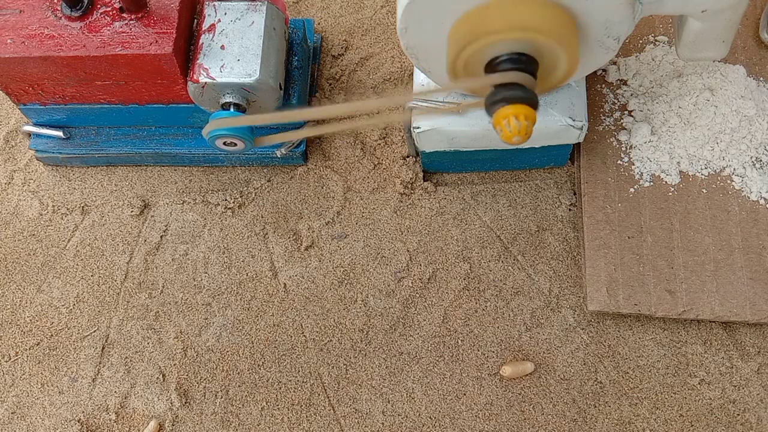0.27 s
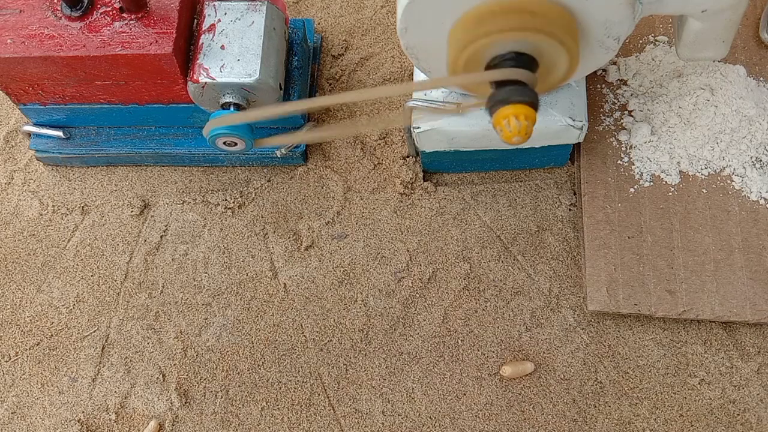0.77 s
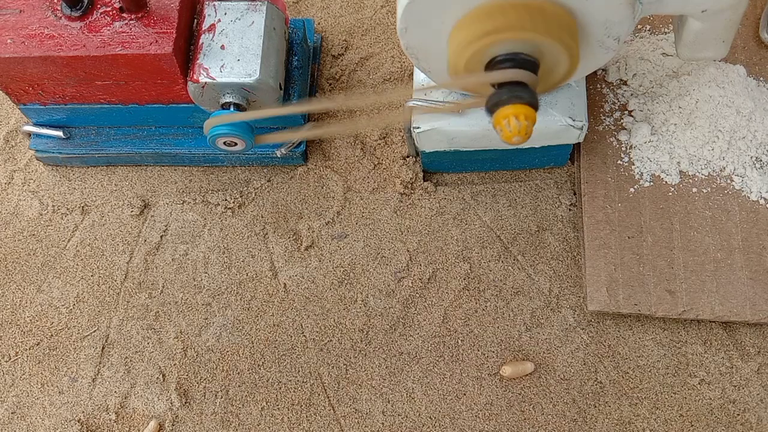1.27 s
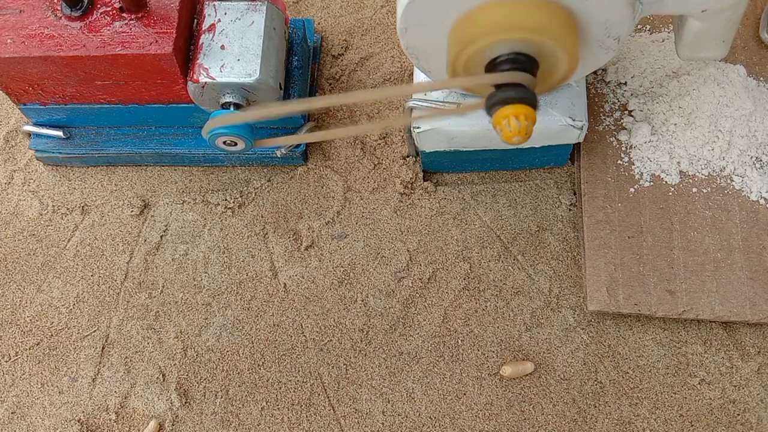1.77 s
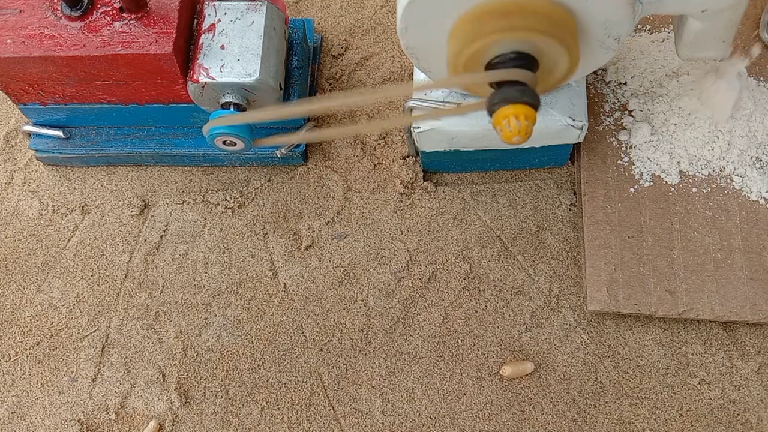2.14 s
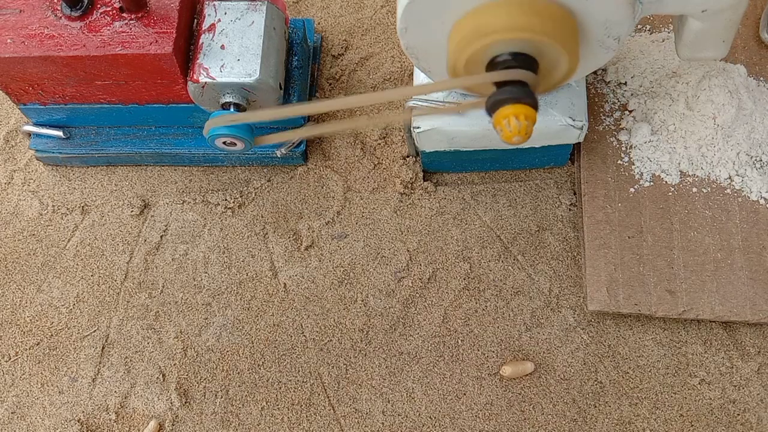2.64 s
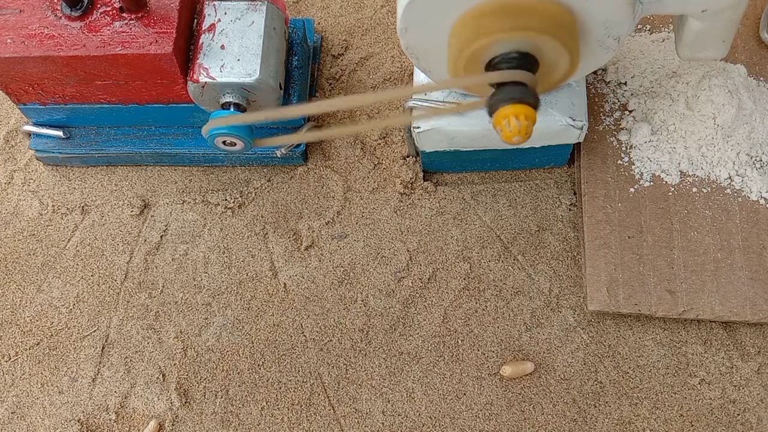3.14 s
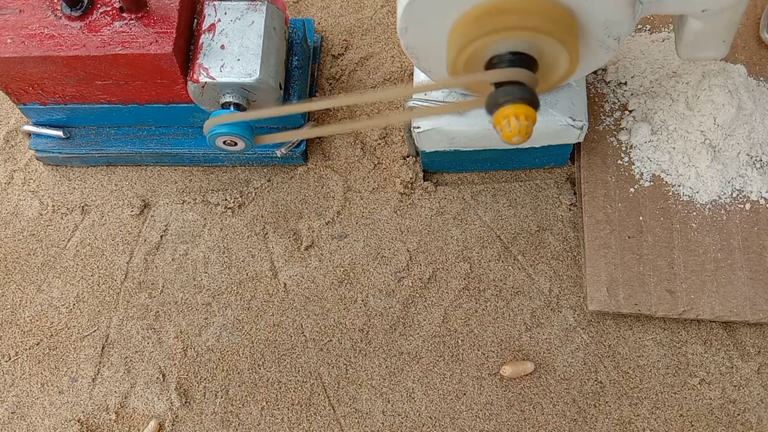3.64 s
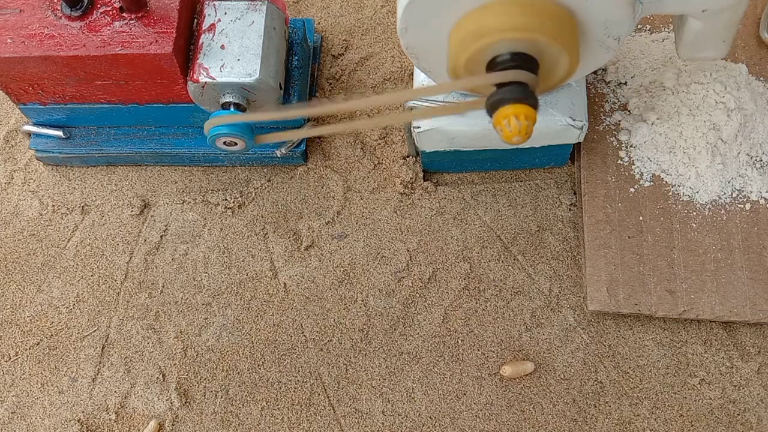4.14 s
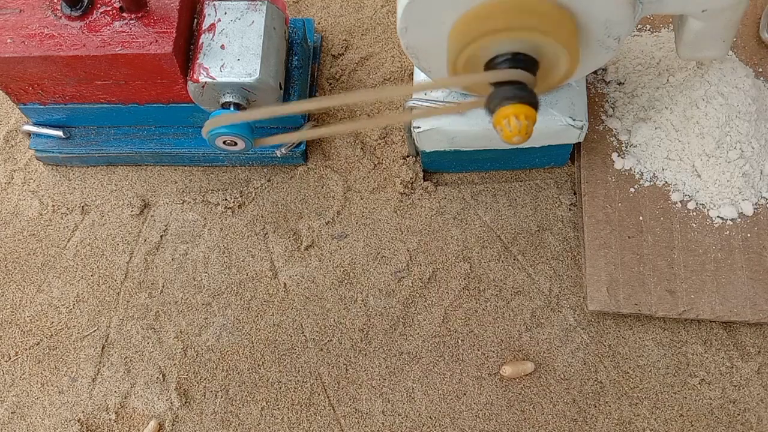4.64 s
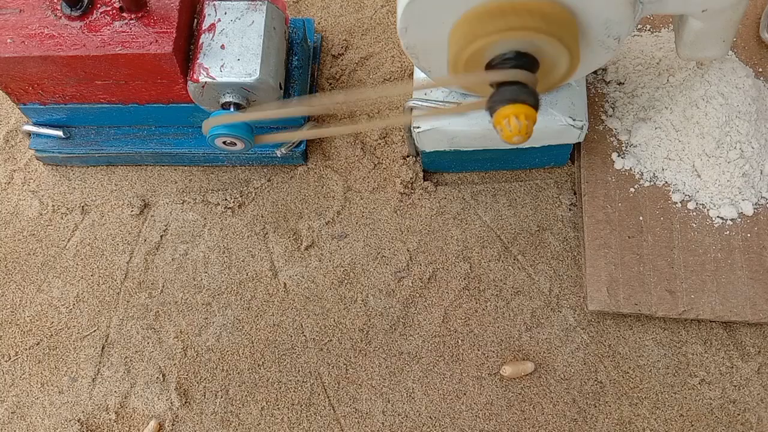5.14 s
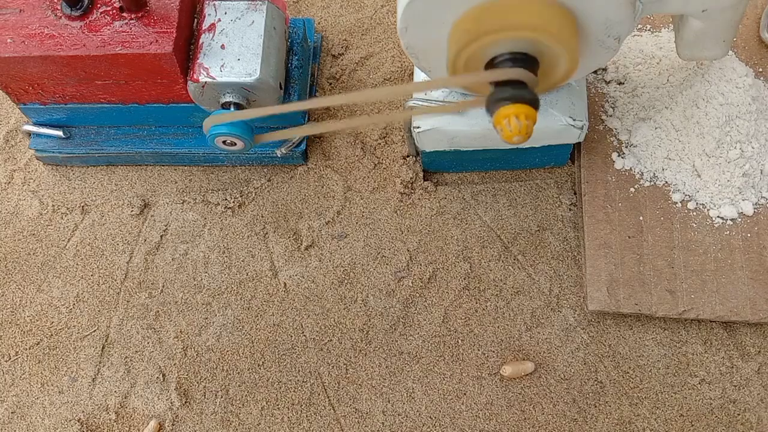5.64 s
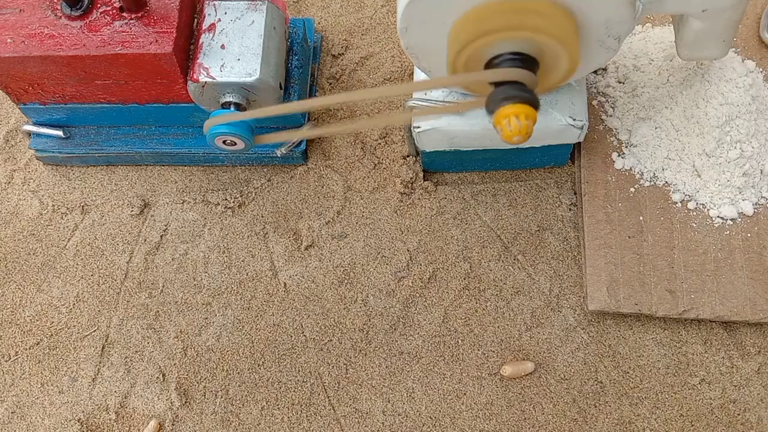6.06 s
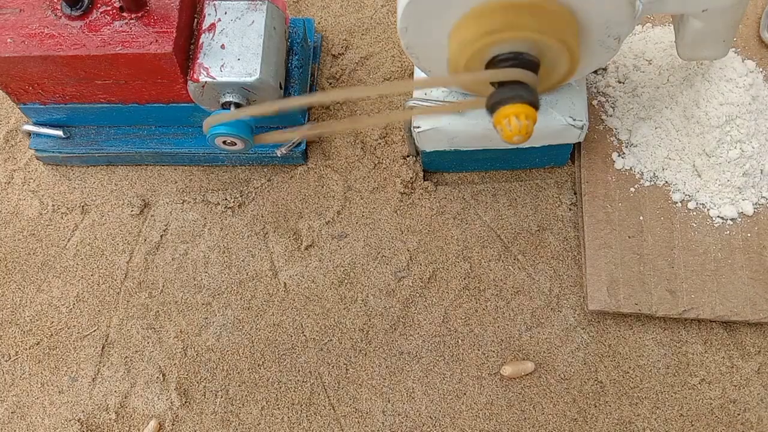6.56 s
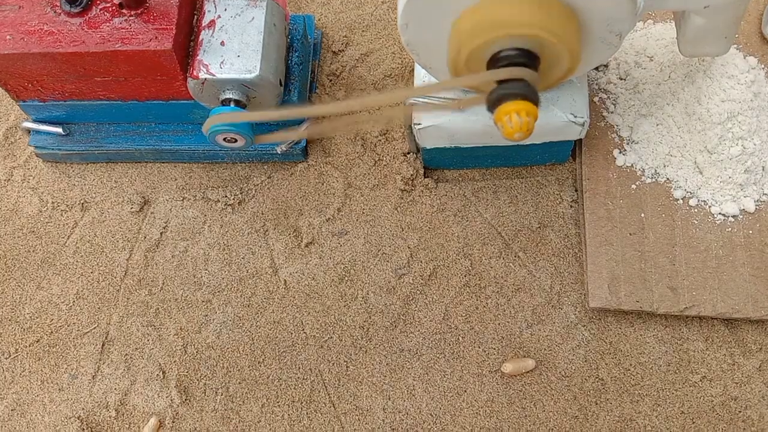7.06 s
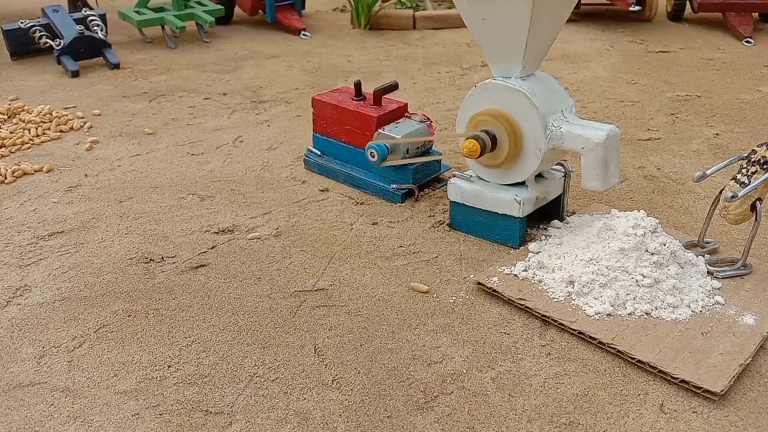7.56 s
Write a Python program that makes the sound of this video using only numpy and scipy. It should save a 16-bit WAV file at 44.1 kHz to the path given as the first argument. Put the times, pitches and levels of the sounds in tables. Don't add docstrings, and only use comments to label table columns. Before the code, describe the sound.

A small single-cylinder engine knocks and clatters, speeding up from six to twelve firings a second, then coasting, the run-up repeating in overlapping passes.

```python
import sys
import numpy as np
from scipy import signal
from scipy.fft import rfft, irfft
from scipy.io import wavfile
from scipy.ndimage import uniform_filter1d

SR = 44100
rng = np.random.default_rng(int(sys.argv[2]) if len(sys.argv) > 2 else 0)


def to_linear_factor(level_db):
    exponent = np.asarray(level_db, float) / 20
    return 10 ** exponent


def unload_audio(sound):
    columns = np.transpose(np.atleast_2d(sound))
    steps = np.round(np.clip(columns, -1, 1) * 32767)
    wavfile.write(sys.argv[1], SR, steps.astype(np.int16))


N = 343980
LEAD_S, RUN_S = .22, 3.06
M = int(RUN_S * SR)
T = np.arange(M) / SR - LEAD_S
START_RATE = 6.0097
CYCLES_RUN = 30
CUT_S = 2.03


def level(x):
    return x / np.sqrt(np.mean(x ** 2))


def colour(x, points):
    hz, db = np.transpose(points)
    f = np.fft.rfftfreq(4096, 1 / SR)
    cep = irfft(np.interp(np.log(f + 1), np.log(hz), db) * np.log(10) / 20)
    cep[1:2048] *= 2
    cep[2049:] = 0
    impulse = irfft(np.exp(rfft(cep)))[:2048]
    return signal.fftconvolve(x, impulse)[:len(x)]


def ring(modes, spread_db, detune):
    hz, db, t60 = np.transpose(modes)[:, :, None]
    luck = rng.standard_normal((2, len(modes), 1))
    t = np.arange(2200) / SR
    decay = np.exp(-np.log(1000) * t / t60)
    tones = np.sin(2 * np.pi * hz * (1 + detune * luck[1]) * t)
    response = np.sum(to_linear_factor(db + spread_db * luck[0]) * tones * decay, axis=0)
    bass_cut = signal.butter(4, 850, "high", fs=SR, output="sos")
    return signal.sosfilt(bass_cut, response)


def add(track, s, sound):
    i = int((s + LEAD_S) * SR)
    track[i:i + len(sound)] += sound[:M - i]


def grit(count, scatter_db):
    size_db = scatter_db * np.repeat(rng.uniform(-0.85, 1, count // 24 + 1), 24)[:count]
    return level(rng.standard_normal(count) * to_linear_factor(size_db))


def fade_db(s):
    return -13.5 * np.maximum(0.31 - s, 0) - 63 * np.maximum(s - 2.5, 0)


def gained(s):
    gain_per_s, drag_per_s2, governed_rate = 3.2738, .0718, 12.548
    rate = START_RATE + gain_per_s * s - drag_per_s2 * s ** 2
    return np.minimum(rate, governed_rate) - START_RATE


def moments(share):
    first_firing_s = -.0171
    turns = np.cumsum(START_RATE + gained(T)) / SR
    turns_since = turns - np.interp(first_firing_s, T, turns)
    return np.interp(np.arange(CYCLES_RUN) - 1 + share, turns_since, T)


def hum():
    band = signal.butter(2, (35, 70), "band", fs=SR, output="sos")
    return to_linear_factor(-71) * level(signal.sosfilt(band, rng.standard_normal(N)))


def dove():
    # start_s, length_s, pitch_hz, level_db, scoop (share of pitch), scoop_s
    coo_notes = [
        (2.26, .31, 347.5, -39.5, -.16, .022),
        (2.745, .11, 330, -37, .11, .06),
    ]
    attack_s, release_s, sag_db_per_s, wobble_db = .025, .06, -16.5, 1.5
    out = 0
    slow = uniform_filter1d(rng.standard_normal((2, M)), size=900, axis=1)
    wobble = level(uniform_filter1d(slow, size=900, axis=1))
    for s, length, pitch, db, scoop, scoop_s in coo_notes:
        since = np.clip(T - s, 0, length)
        hz = pitch * (1 + scoop * np.exp(-since / scoop_s) + .002 * wobble[0])
        phase = 2 * np.pi * np.cumsum(hz) / SR
        voice = np.sin(phase) + to_linear_factor(-12) * np.sin(2 * phase)
        shape = np.minimum(since / attack_s, 1) * np.minimum((length - since) / release_s, 1)
        loudness = to_linear_factor(db + sag_db_per_s * since + wobble_db * wobble[1])
        out = out + np.sqrt(2) * shape * loudness * voice
    return out


def puffs():
    pipe_hz = (470, 590)
    puff_db, coast_db, bark_db, bark_scatter_s = -42, -24, -30.5, 0.00788
    out, t = np.zeros(M), np.arange(1000) / SR
    swell = t / .003 * np.exp(1 - t / .003)
    luck = rng.standard_normal((CYCLES_RUN, 5))
    for opens, fires, (low, high, early, low2, high2) in zip(moments(.525), moments(0), luck):
        opening_db = (coast_db if opens > CUT_S else puff_db) + fade_db(opens)
        bark_s = fires + bark_scatter_s * np.clip(early, -1, 1)
        firing_db = bark_db - 30 * (fires > CUT_S)
        blows = [(opens, opening_db, low, high), (bark_s, firing_db, low2 - 1.5, high2)]
        for s, db, *mix in blows:
            note = 0
            for hz, m in zip(pipe_hz, mix):
                note = note + to_linear_factor(db - 5 + 2 * m) * np.sin(2 * np.pi * hz * (1 + .012 * m) * t)
            add(out, s, note * swell)
    return out


def pings():
    count, low_hz, high_hz, ring_cycles, scatter_db = 2600, 900, 9000, 17, 3
    when, pitch, size = rng.uniform(size=(count, 3)).T[:, :, None]
    k = np.arange(700)
    hz = low_hz * (high_hz / low_hz) ** pitch
    strength = to_linear_factor(-scatter_db * np.log(size + 0.09)) * np.sqrt(hz)
    decay = np.exp(-k / SR * np.sqrt(hz * 3000) / ring_cycles)
    tick = strength * np.sin(2 * np.pi * hz * k / SR) * decay
    place = (when * M).astype(int) + k
    return level(np.bincount(place.ravel(), tick.ravel(), M)[:M])


def rattle_envelopes(valve_times):
    start_db, db_per_rate, cut_db, coast_db_per_s, treble_cut_db = -23.5, 0.796, 1, -15.5, -14.5
    after, dull_db = np.zeros((2, M))
    firing = moments(0)
    for s in valve_times:
        after_db = start_db + db_per_rate * gained(s)
        after_db += (s > CUT_S) * (cut_db + coast_db_per_s * (s - CUT_S))
        on = slice(int((s + LEAD_S) * SR) + 1, int((s + LEAD_S + .22) * SR))
        since = T[on] - s
        gap = np.min(firing[firing > s], initial=s + .17) - s
        late_tap = 0.16 * np.exp(-((since - 0.41 * gap) / 0.0036) ** 2)
        settle = to_linear_factor(after_db + 0.56) * (1 + late_tap + 0.66 * np.exp(-since / (0.45 * gap)))
        choke = .3 + .7 * np.exp(-np.maximum(since - gap, 0) / .016)
        after[on] = settle * choke * np.minimum(since / 0.0039, 1)
        dull_db[on] = (-3.5 + treble_cut_db * (s > CUT_S)) * np.clip(since / gap, 0, 1)
    return after, dull_db


def rattle(after, tin_modes):
    # pitch_hz, level_db
    rattle_spectrum = [(150, -47.5), (240, -16.5), (400, -20.5), (580, -4.5), (740, -12.5), (960, -5),
                       (1500, -3.5), (2100, -0.5), (3300, 0), (3760, -13.5), (4500, 0), (7200, -13),
                       (9000, -16), (16000, -31)]
    hiss, shake = grit(count=M, scatter_db=-1.0), grit(count=M, scatter_db=4.5)
    hiss = level(hiss + to_linear_factor(-4) * pings())
    loose_tin = tin_modes[:8] + tin_modes[9:]
    tin = ring(loose_tin, spread_db=2, detune=0)
    held = np.repeat(rng.standard_normal((2, M // 180 + 1)), 180, axis=1)[:, :M]
    fits = uniform_filter1d(held, size=120, axis=1)
    clumps = to_linear_factor(fits * np.array([[1.5], [3.5]]) - np.array([[.2], [1.2]]))
    gas = colour(hiss * after * clumps[0], rattle_spectrum) / np.std(colour(hiss, rattle_spectrum))
    buzz = signal.fftconvolve(shake * after * clumps[1], tin)[:M] / np.sqrt(np.sum(tin ** 2))
    return 0.92 * gas + 0.24 * buzz


def clatter(valve_times, tin_modes):
    # pitch_hz, level_db
    chatter_spectrum = [(200, -23), (600, -12), (950, -4), (1700, 0), (2600, 2), (3350, -1.5), (3700, -5),
                        (4250, -15.5), (5300, -6), (7200, -19.5), (9000, -11.5), (16000, -17)]
    # pitch_hz, level_db, t60_s
    rocker_modes = [(4345, -2, 0.12), (4840, -6.5, 0.036)]
    burst_db, scatter_db, burst_ms, coast_burst_ms = -14.5, .5, 20.24, 13.9
    cover_db, cover_db_per_rate = -4.5, -1.6
    out, t = np.zeros(M), np.arange(2200) / SR
    for s, (strong, slow) in zip(valve_times, rng.standard_normal((CYCLES_RUN, 2))):
        db = burst_db + scatter_db * strong + fade_db(s)
        length = (coast_burst_ms if s > CUT_S + .05 else burst_ms) * (1 + 0.037 * slow) / 1000
        shape = np.minimum(t / .002, 1) / (1 + (t / length) ** 8)
        shape *= 1 + .5 * np.cos(2 * np.pi * (t - .002) / (.38 * length))
        push = grit(count=len(t), scatter_db=1.5) * shape
        push[20] += 9
        covers = signal.fftconvolve(push, ring(tin_modes, spread_db=4, detune=.015))[:len(t)]
        rocker = signal.fftconvolve(push, ring(rocker_modes, spread_db=2, detune=.012))[:len(t)]
        chatter = level(colour(push, chatter_spectrum)) + to_linear_factor(-9.5) * level(covers)
        chatter += to_linear_factor(cover_db + cover_db_per_rate * gained(s) + 3 * slow) * level(rocker)
        add(out, s, chatter * to_linear_factor(db + .2) / np.std(chatter[:int(length * SR)]))
    return out


def valves():
    # pitch_hz, level_db, t60_s
    tin_modes = [(1070, -7, .045), (1450, -5, .03), (1650, -4, .03), (1960, -3, .03), (2150, -2, .035),
                 (2620, -3, .03), (3050, -5, .035), (3200, -6, .035), (4270, -2.5, .06), (4700, -8, .03),
                 (5300, -8, .03), (5860, -12, .03), (6700, -15, .03)]
    treble_db, treble_db_per_rate = -5, .5
    valve_times = moments(.2106)
    after, dull_db = rattle_envelopes(valve_times)
    out = clatter(valve_times, tin_modes) + rattle(after, tin_modes)
    treble = signal.sosfiltfilt(signal.butter(2, 3700, "high", fs=SR, output="sos"), out)
    shelf_db = treble_db + treble_db_per_rate * gained(T) + uniform_filter1d(dull_db, size=40) + 3.5
    return out + (to_linear_factor(shelf_db) - 1) * treble


def knocks():
    # pitch_hz, level_db, t60_s
    block_modes = [(930, -8, .06), (1068, -1, .14), (1215, -1, .05), (1380, -1, .05), (1605, -2, .07),
                   (1830, -2, .07), (1980, -3, .08), (2200, 0, .11), (2450, -6, .06), (3150, -8, .08),
                   (4550, -14, .05)]
    # pitch_hz, level_db
    roar_spectrum = [(200, -42), (600, -30), (800, -18), (950, -5), (1300, 0), (2300, -1), (2750, -13),
                     (3200, -12), (3900, -24), (4600, -16), (6500, -27), (9000, -30), (16000, -34)]
    knock_db, db_per_rate, coast_db_per_s, scatter_db = -11, -0.92, -3, .7
    mean_push_ms, push_scatter_ms = 5.9, .35
    out, t = np.zeros(M), np.arange(2000) / SR
    rise = np.minimum(t / 0.0007, 1)
    for s, (strong, slow) in zip(moments(0), rng.standard_normal((CYCLES_RUN, 2))):
        db = knock_db + db_per_rate * gained(s) + coast_db_per_s * max(s - CUT_S, 0)
        db += scatter_db * strong + fade_db(s)
        push_s = (mean_push_ms + push_scatter_ms * slow) / 1000
        push = rng.standard_normal(len(t)) * rise * np.exp(-(t / (1.37 * push_s)) ** 2)
        push[40] += 4.7
        bell = level(signal.fftconvolve(push, ring(block_modes, spread_db=2.5, detune=.012))[:len(t)])
        gas = rng.standard_normal(len(t)) * rise * np.exp(-t / (2.04 * push_s))
        blow = bell + to_linear_factor(3.0) * level(colour(gas, roar_spectrum))
        add(out, s - .001, blow * to_linear_factor(db + 1.5) / np.std(blow[:int(.016 * SR)]))
    return out


def scene():
    # pitch_hz, level_db
    mic_response = [(7300, 0.5), (8000, -12), (8900, -16.5), (9800, -27.0), (11300, -19.0), (12500, -30),
                    (14000, -33), (15400, -34), (16000, -70)]
    # shift_s, then enter_s and leave_s within the run-up
    passes = [
        (-2.53587, -.13, 2.796),
        (0, -.13, 2.815),
        (2.68753, -.135, 2.81),
        (5.29694, -.09, 2.81),
    ]
    ceiling, splice_s = .72, .0015
    run = dove() + puffs() + valves() + knocks()
    run = signal.sosfilt(signal.butter(6, 195, "high", fs=SR, output="sos"), run)
    run = run / (1 + (run / ceiling) ** 4) ** .25
    run = colour(run, mic_response)
    out = np.zeros(N)
    for shift, enters, leaves in passes:
        k = np.arange(N) - round((shift - LEAD_S) * SR)
        inside = (k > (enters + LEAD_S) * SR) & (k < (leaves + LEAD_S) * SR)
        edge = np.minimum(k / SR - LEAD_S - enters, leaves + LEAD_S - k / SR) / splice_s
        out[inside] += run[k[inside]] * np.minimum(edge[inside], 1)
    return (out + hum())[None]


def low_pass(x):
    return signal.sosfilt(signal.butter(12, 15830, fs=SR, output="sos"), x)


def record(dry):
    return low_pass(dry)


dry = scene()
out = record(dry)
unload_audio(out)
```